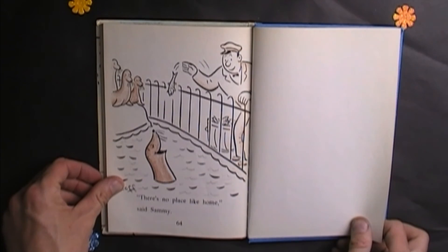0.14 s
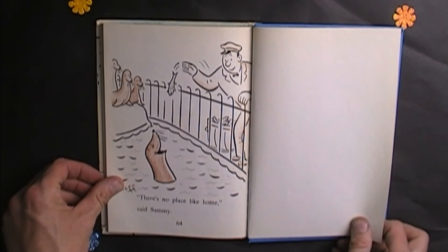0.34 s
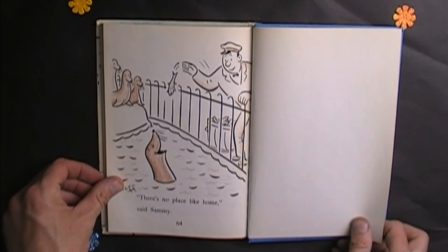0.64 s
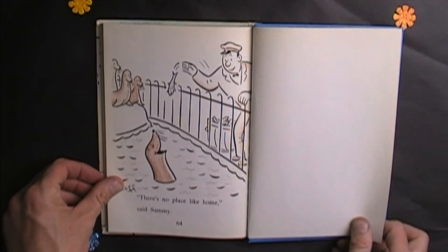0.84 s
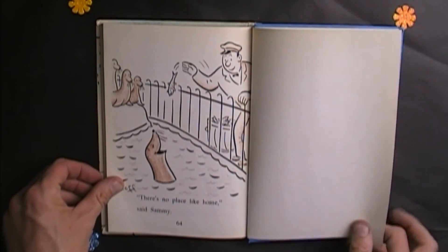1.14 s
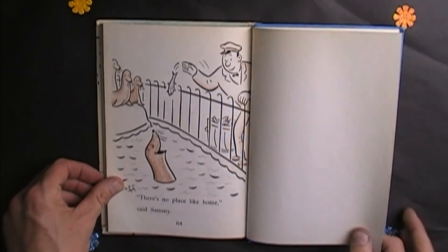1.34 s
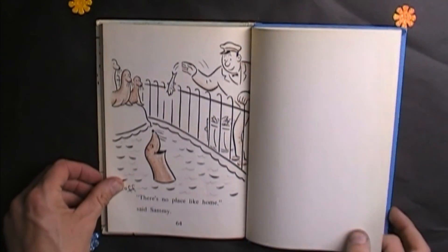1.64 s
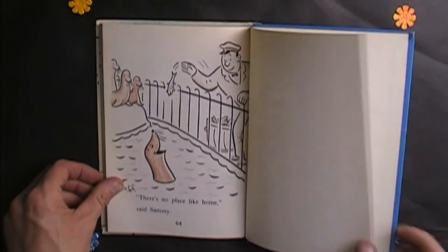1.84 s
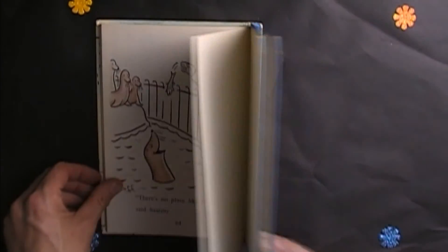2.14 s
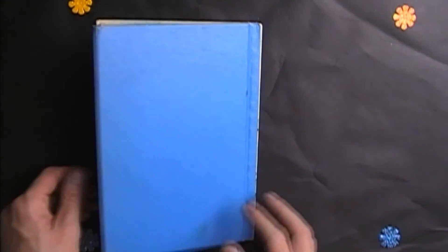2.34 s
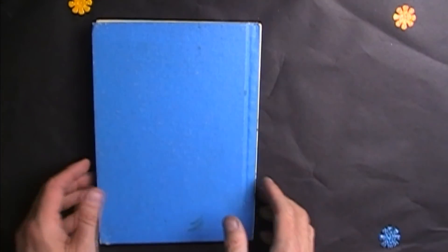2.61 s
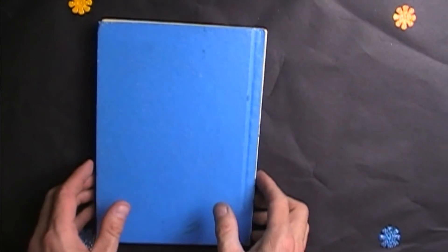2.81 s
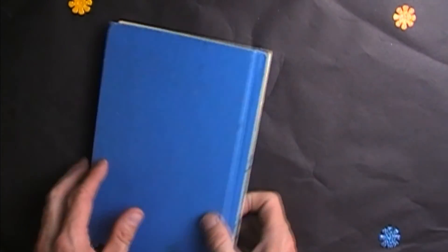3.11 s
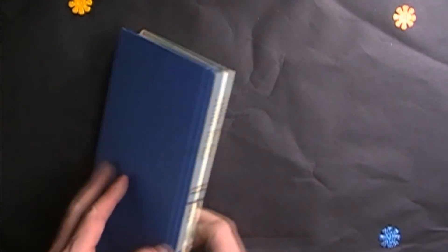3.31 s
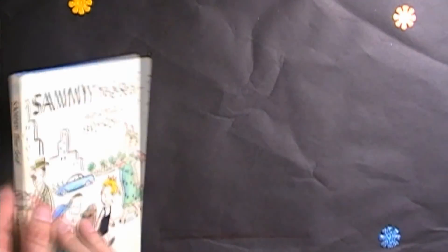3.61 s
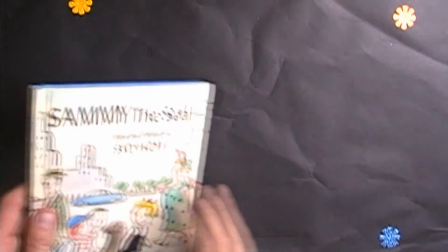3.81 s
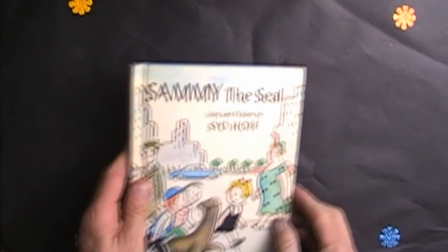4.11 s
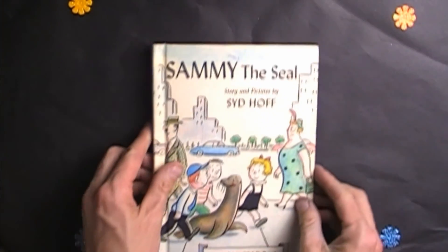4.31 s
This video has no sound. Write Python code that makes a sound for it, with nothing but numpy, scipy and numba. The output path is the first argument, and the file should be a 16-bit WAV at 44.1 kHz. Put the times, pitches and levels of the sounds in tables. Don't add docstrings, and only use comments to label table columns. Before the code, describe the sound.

Fingers rub over the pages of a hardcover book, the binding creaks and snaps sharply, then the boards clap shut with a solid thud.

```python
import sys
import numpy as np
from scipy import signal
from scipy.fft import rfft, irfft
from scipy.io import wavfile
from scipy.ndimage import uniform_filter1d
from numba import njit

SR = 44100
rng = np.random.default_rng(int(sys.argv[2]) if len(sys.argv) > 2 else 0)


def put_to_file(sound):
    columns = np.atleast_2d(sound).T
    safe = np.clip(columns, -1, 1)
    whole_steps = np.round(safe * 32767)
    wavfile.write(sys.argv[1], SR, whole_steps.astype(np.int16))


def linear_from_db(decibels):
    return 10 ** (np.asarray(decibels, float) / 20)


N = 196421
TIME = np.arange(N) / SR
HALF = SR // 2
HALF_S = TIME[:HALF]
OPPOSED = np.array([[1], [-1]])


def level(x, db):
    return x * linear_from_db(db) / np.sqrt(np.mean(x ** 2))


def decay(t60_s):
    return np.exp(-np.log(1000) * HALF_S / t60_s)


def colour(x, points):
    hz, db = np.transpose(points)
    size = x.shape[-1]
    bin_hz = np.arange(size // 2 + 1) * SR / size
    gain_db = np.interp(np.log(bin_hz + 1), np.log(hz), db, -60, -60)
    return irfft(rfft(x) * linear_from_db(gain_db), size)


@njit
def svf(x, hz, width_hz):
    y, b, l = np.empty(len(x)), 0., 0.
    for i in range(len(x)):
        g, k = np.tan(np.pi * hz[i] / SR), width_hz[i] / hz[i]
        v = (b + g * (x[i] - l)) / (1 + g * (g + k))
        b, l, y[i] = 2 * v - b, l + 2 * g * v, k * v
    return y


def band(x, hz, share):
    hz = np.clip(hz + np.zeros(len(x)), 50, .4 * SR)
    return svf(svf(x, hz, share * hz), hz, share * hz)


def thin(x, hz):
    return signal.sosfilt(signal.butter(3, hz, "high", fs=SR, output="sos"), x)


def ring(hz, t60_s):
    return np.sin(2 * np.pi * hz * HALF_S) * decay(max(t60_s, 1e-3))


def add(out, s, sound):
    i = int(s * SR)
    out[..., i:i + sound.shape[-1]] += sound[..., :N - i]


# f/Hz, density/dB
FAN = [(40, -51), (60, -9.5), (90, -19), (130, -4), (225, -8), (260, -3), (360, -1), (680, -4), (910, -3),
       (1300, -8.5), (4300, -20.5), (4700, -24), (9000, -28.5), (11500, -43)]
# f/Hz, side minus mid/dB
FAN_SIDE = [(60, -3), (110, -1.5), (190, 0.5), (340, -2), (610, -0.5), (1090, -2), (1950, 0), (3480, -2),
            (6210, -1), (11100, 1.5)]
# f/Hz, level/dB, skirt width/Hz
LINES = [(121.2, -69.5, 19), (1086, -71, 3.2), (4070, -83, 8)]


def background():
    mid, side = rng.standard_normal((2, N))
    mid = colour(mid, FAN)
    side = colour(colour(side, FAN), [(20, 0)] + FAN_SIDE + [(20000, 0)])
    fan = np.array([mid + side, mid - side]) * linear_from_db(-58) / np.std(mid)
    lines = np.zeros(N)
    for hz, db, width_hz in LINES:
        lines += linear_from_db(db) * np.sin(2 * np.pi * hz * TIME)
        lines += level(band(rng.standard_normal(N), hz, width_hz / hz), db - 3.0)
    return fan + lines * linear_from_db(1.5 * OPPOSED)


HINGE_HZ = (2504, 3477, 4410)
# t/s, level/dB, low mode/dB, high mode/dB
CREAKS = [(0.6, -49.5, -2, -8), (0.664, -58, -1, -20), (0.702, -51.5, -2, -14), (0.7302, -56, -1, -23),
          (0.7517, -67, -4, -17), (0.7736, -70, -9, -14), (0.855, -53, 4.5, -12), (0.8874, -60, -6, -9),
          (0.946, -51, -8, -20), (0.9946, -58, 2, -11), (1.1693, -38, -20, -10), (1.3523, -53, -3, -7),
          (1.4454, -46, -6, -18), (1.557, -53, 3, -19), (1.8337, -47.5, -12, -9)]
# t/s, level/dB
MURMUR = [(.55, -99), (.7, -76.5), (1.1, -70), (1.32, -63), (1.42, -79), (1.52, -66), (1.62, -70),
          (2.06, -70), (2.1, -61), (2.28, -66.5), (2.56, -70), (2.62, -88)]


def creaks():
    hinge = np.zeros((3, N))
    for s, db, low_db, high_db in CREAKS:
        mode_db = db + np.array([[low_db], [0], [high_db]])
        add(hinge, s, linear_from_db(mode_db) * np.exp(-HALF_S / 0.0055))
    hinge += linear_from_db(np.interp(TIME, *np.transpose(MURMUR)))
    out = np.zeros(N)
    for hz, push in zip(HINGE_HZ, hinge):
        out += level(band(rng.standard_normal(N), hz, .095), -4.0) * push
    return out


# t/s, length/s, level/dB, swell to end/dB, weight on board/dB
PAGE_STROKES = [(.85, 0.2, -67.5, 7, -5), (1.017, 0.046, -58, -0.5, -3), (1.076, 0.051, -53.5, 3.5, -12),
                (1.138, 0.065, -47.5, 1, -14.5), (1.227, 0.068, -50.5, -7.5, -7.5),
                (1.355, 0.018, -50.5, -2, -10), (1.391, 0.0067, -42, -9, -10), (1.458, 0.01, -59, -3.5, -1),
                (1.5, .1, -66.5, 2, 1.5), (1.613, 0.014, -56.5, 6, -8), (1.632, 0.054, -41.5, -2.5, -9.5),
                (1.704, 0.015, -54, -4.5, 5.5), (1.765, 0.011, -50.5, -2, -3), (1.789, 0.053, -59, 7, -3.5),
                (1.886, 0.076, -62, 11, -11), (1.987, 0.18, -59, -1.5, -9.5),
                (2.206, 0.094, -62.5, -2, -2.5), (2.305, 0.049, -49.5, 4.5, -17)]
# t/s, length/s, level/dB, swell to end/dB, weight on board/dB
COVER_STROKES = [(2.39, 0.077, -56.5, -1.5, -12), (2.48, 0.06, -59, 6.5, -22),
                 (2.631, 0.063, -53.5, 2, -14), (2.749, 0.061, -56.5, 0, -3), (2.88, 0.037, -55, 3, -2),
                 (2.94, 0.025, -50.5, 2, -4.5), (3.014, 0.028, -50.5, 8, -8.5), (3.07, 0.032, -54, -2, 2.5),
                 (3.12, 0.054, -50.5, 0, -5), (3.219, 0.07, -53, 4.5, -8.5), (3.299, 0.1, -47.5, -1, -12.5),
                 (3.39, 0.038, -48, 0, -5.5), (3.422, 0.0081, -38.5, 6, -7), (3.46, 0.12, -41.5, -16, 3.5),
                 (3.58, 0.085, -68, -9.5, 14.5), (3.66, 0.077, -76, 9, 3), (3.74, 0.205, -69, 3.5, 1),
                 (3.96, 0.021, -57, 5.5, -8), (4.05, 0.035, -53, 0.5, -8), (4.101, 0.08, -56.5, 4.5, -13),
                 (4.2, .1, -54, -2, -8), (4.322, 0.011, -53, 0, -3.5), (4.34, 0.057, -54.5, 0, -5),
                 (4.42, .04, -49.5, 1, -5)]


def strokes():
    page_rise_db_per_s, cover_rise_db_per_s, fall_db_per_s = 1503, 604, 505
    rub, weight = np.zeros(N), np.zeros(N)
    rises = [page_rise_db_per_s] * len(PAGE_STROKES) + [cover_rise_db_per_s] * len(COVER_STROKES)
    for (s, length_s, db, swell_db, weight_db), rise in zip(PAGE_STROKES + COVER_STROKES, rises):
        held = np.clip((TIME - s) / length_s, 0, 1)
        rise_db = rise * np.minimum(TIME - s, 0)
        fall_db = fall_db_per_s * np.maximum(TIME - s - length_s, 0)
        power = linear_from_db(2 * (db + swell_db * held + rise_db - fall_db))
        rub += power
        weight += power * linear_from_db(2 * weight_db)
    return np.sqrt(rub), np.sqrt(weight)


def grains(spread_db, flutter_db, rate_hz):
    k = int(SR / rate_hz)
    flutter = uniform_filter1d(np.repeat(rng.standard_normal(N // k + 1), k), k)[:N]
    return rng.standard_normal(N) * linear_from_db(spread_db * rng.exponential(size=N) + flutter_db * flutter)


# t/s, fingertip gap f/Hz, free board span f/Hz
GRIP = [(.8, 5830, 950), (1.1, 6600, 960), (1.25, 6160, 1480), (1.65, 6500, 1580), (1.9, 6870, 1190),
        (2.4, 6650, 920), (2.47, 8150, 930), (2.56, 8800, 950), (2.63, 7000, 970), (2.96, 7200, 900),
        (3.25, 6260, 1240), (3.45, 7200, 900), (3.8, 6140, 900), (4.0, 7300, 1020), (4.3, 7300, 1500),
        (4.45, 6400, 1060)]
PAGE_DB = (-3, -2, -3, 1.5)


def slide():
    rub, weight = strokes()
    grip_s, gap_hz, span_hz = np.transpose(GRIP)
    hiss_hz, board_hz = np.interp(TIME, grip_s, gap_hz), np.interp(TIME, grip_s, span_hz)
    contact = grains(spread_db=2.5, flutter_db=2.5, rate_hz=60)

    wander = linear_from_db(level(uniform_filter1d(rng.standard_normal(N), SR // 12), -4))
    swish = level(band(contact, hiss_hz * wander, 0.49), -4.0)
    hiss = level(level(band(contact, hiss_hz, 1.21), 0) + swish, 0) * rub

    page_hz = np.interp(TIME, [2.3, 2.6], [3400, 4200]) * wander[::-1] ** .5
    page_share = np.interp(TIME, [2.3, 3.7], [1.0, .7])
    flex = linear_from_db(np.interp(TIME, [2.3, 2.6, 3.5, 3.9], PAGE_DB)) * rub ** .7 * weight ** .3
    fibres = contact + grains(spread_db=3.0, flutter_db=-2.1, rate_hz=56)
    page = level(band(fibres, page_hz, page_share), 0) * flex

    board = level(band(grains(spread_db=3.0, flutter_db=2.5, rate_hz=60), board_hz, 1.0), 0) * weight
    table = level(band(rng.standard_normal(N), 340, 3.9), -12) * weight

    ticks = rng.standard_normal(N) * (rng.random(N) < 500 / SR) * linear_from_db(1.5 * rng.exponential(size=N))
    crackle = level(band(ticks, 5500, 1.3), -13) * rub
    return hiss + page + board + table + crackle


# t/s, level/dB, f/Hz, t60/s
BUMPS = [(1.03, -43, 940, 0.034), (1.044, -36.5, 920, 0.024), (1.204, -35.5, 1480, 0.017),
         (1.208, -43, 930, 0.028), (1.387, -38, 1600, 0.015), (1.655, -43, 1910, 0.04),
         (1.823, -48, 1520, 0.071), (2.337, -41, 1460, .02), (2.545, -58, 2704, 0.15),
         (2.76, -50, 205, 0.03), (2.78, -48, 190, 0.034), (2.801, -52, 260, 0.03), (2.966, -49, 710, 0.028),
         (3.069, -49, 907, 0.074), (3.417, -37.5, 834, 0.043), (4.074, -51, 1080, 0.03),
         (4.234, -35, 774, 0.012), (4.441, -44, 566, 0.037)]


def bumps():
    out = np.zeros(N)
    size = SR // 20
    for (s, db, hz, t60_s), scatter in zip(BUMPS, rng.standard_normal((len(BUMPS), size))):
        touch = linear_from_db(-27.5) * scatter * np.exp(-TIME[:size] / 0.013)
        touch[0] = 1
        board = ring(hz, t60_s) - 0.74 * ring(1.7 * hz, 0.3 * t60_s)
        add(out, s, linear_from_db(db) * signal.fftconvolve(touch, board))
    return thin(out, hz=150)


# t/s, peak level/dB, ring f/Hz, breadth/dB,
# tearing/dB
SNAPS = [(1.138, -40, 5400, -5, 3), (1.2263, -31, 6000, -6, 0), (1.365, -36, 2860, 2, -4),
         (1.3873, -29.5, 6550, -7, -7), (1.4561, -39.5, 6700, -10, -2), (1.9226, -43, 6600, 3, -7),
         (2.1844, -18, 7500, -11.5, -13), (2.3365, -10, 6840, -3, -1.5), (2.966, -39.5, 7900, 8, -3),
         (3.048, -31.5, 6740, -3, -3), (3.4307, -14.5, 2500, -16, 0), (4.0708, -36, 4300, -1, -5),
         (4.2227, -40, 6550, 0, -4), (4.4424, -38, 7910, 9, -9)]
# t/s, peak level/dB, ring f/Hz, breadth/dB, tearing/dB
RIP = [
    (1.9682, -25, 6060, 1, 3.5),
    (1.9692, -20, 9100, -4, -9),
    (1.9706, -22.5, 4670, -2, -3),
    (1.978, -27, 8500, -6, -15),
    (1.9836, -31, 7000, -11, -19),
]


def snaps():
    out = np.zeros(N)
    events = SNAPS + RIP
    t60s_s = [0.0025] * len(SNAPS) + [0.0014] * len(RIP)
    noises = thin(rng.standard_normal((len(events), HALF)), hz=2760)
    for (s, db, hz, broad_db, tear_db), t60_s, noise in zip(events, t60s_s, noises):
        crack = -ring(hz, t60_s) - linear_from_db(broad_db) * ring(5600, .0007)
        tear = noise * np.exp(-HALF_S / 0.0016) * (HALF_S > .0004)
        add(out, s, linear_from_db(db) * (crack + linear_from_db(tear_db) * tear))
    return thin(out, hz=600)


# t/s, level/dB, contact/s
CLAP = [
    (3.4306, -14, 0.00058),
    (3.445, -46, 0.002),
]
# f/Hz, level/dB, t60/s, left minus right/dB
THUD_MODES = [(108.5, -26.5, 0.32, 3), (178.7, -7, 0.081, 5), (243, -14, 0.073, 7), (300.7, -27, 0.31, -9),
              (436, -12, 0.099, 1), (491, -12.5, 0.11, -16), (569.5, -2.5, 0.11, 3), (551, 5.5, 0.026, 3),
              (596, -5, 0.081, 7), (681, -18, 0.19, -3), (727, -14, 0.14, 2), (756, -5, 0.11, -4),
              (827.4, 7, 0.058, 1), (837, 2, 0.13, 0), (900, -11, 0.13, -4), (997, 3.5, 0.066, 4),
          (1086, -11.5, 0.077, -5), (1242, -28, 0.074, 2), (1280, -6, 0.064, 8), (1420, -1, 0.065, -4),
          (1480, -14, 0.17, 3), (1603, -8.5, 0.14, 5), (1748, -8, 0.083, -9), (2050, -24, 0.083, -13),
          (2266, -9, 0.037, 16), (2530, -2, 0.068, 0)]
# f/Hz, density/dB
SLAP = [(400, -9), (1200, -2.5), (2480, -9.5), (4170, -21.5), (7900, -24), (10500, -28), (13000, -60)]
# f/Hz, level/dB, t60/s
SWAY = [(150, -43, .2), (195, -27, .16), (330, -39, 0.13)]


def thud():
    body = np.zeros((2, HALF))
    for k, (hz, db, t60_s, pan_db) in enumerate(THUD_MODES):
        sign = (-1) ** k
        body += sign * linear_from_db(db + pan_db * OPPOSED / 2) * ring(hz, t60_s)
    body += linear_from_db(17.5) * ring(953, 0.0052)
    out = np.zeros((2, N))
    for s, db, contact_s in CLAP:
        push = np.exp(-(TIME[:200] / contact_s * 4 - 2) ** 2)
        add(out, s, linear_from_db(db) * signal.lfilter(push / push.sum(), [1], body))
    air = level(colour(rng.standard_normal(HALF), SLAP), -20) * decay(0.11)
    add(out, CLAP[0][0], air)
    shake = sum(linear_from_db(db) * ring(hz, t60_s) for hz, db, t60_s in SWAY)
    add(out, CLAP[0][0] + 0.0037, shake * OPPOSED)
    return thin(out, hz=125)


# f/Hz, t60/s, level/dB, port difference/ratio
ROOM = [(173, 0.2, -20.5, 0.72), (534, 0.26, -16, 0.27), (1404, 0.22, -13.5, 0.41),
        (3490, 0.19, -13.5, 0.83), (7000, 0.22, -16, 1.1)]


def room(x):
    mid, side = rng.standard_normal((2, HALF))
    rise = 1 - np.exp(-HALF_S / 0.0025)
    tail = np.zeros((2, HALF))
    for hz, t60_s, db, apart in ROOM:
        ports = np.array([band(mid + sign * apart * side, hz, 1.86) for sign in (1, -1)])
        part = ports * rise * decay(t60_s)
        tail += linear_from_db(db) * part / np.sqrt(np.sum(part ** 2) / 2)
    return thin(signal.fftconvolve(x[None], tail, axes=1)[:, :N], hz=104)


def scene():
    near = slide() + creaks() + snaps() + bumps() + thud()
    spread = 0.81 * band(np.roll(near[0], shift=9), 8700, 0.33)
    return near + spread * OPPOSED + room(near.mean(axis=0)) + background()


def top_cut(x):
    return signal.sosfilt(signal.butter(12, 11690, fs=SR, output="sos"), x)


def record(dry):
    top_hz, ripple_db, stop_db = 10394, .3, 48
    low_pass = signal.ellip(8, ripple_db, stop_db, top_hz, fs=SR, output="sos")
    return top_cut(signal.sosfilt(low_pass, dry))


dry = scene()
out = record(dry)
put_to_file(out)
```